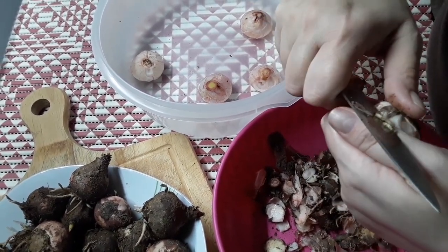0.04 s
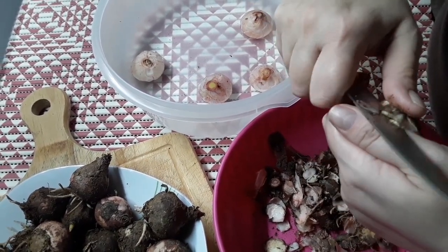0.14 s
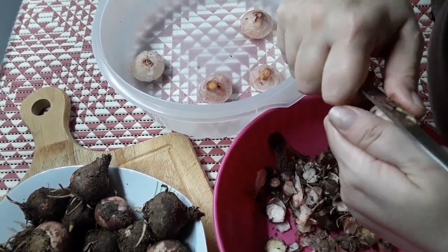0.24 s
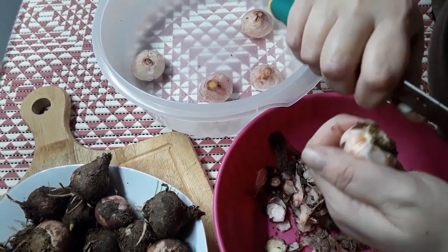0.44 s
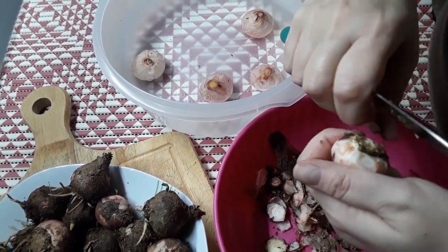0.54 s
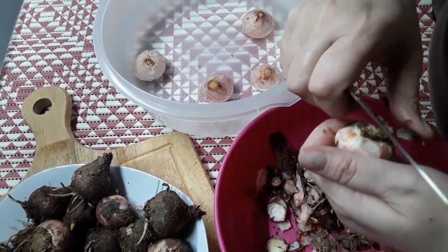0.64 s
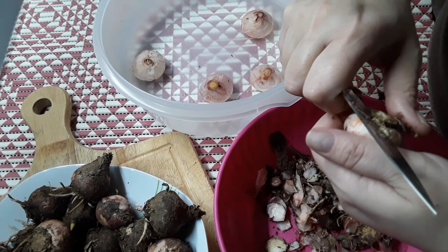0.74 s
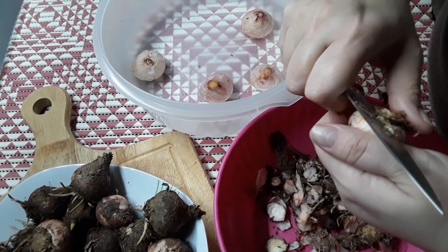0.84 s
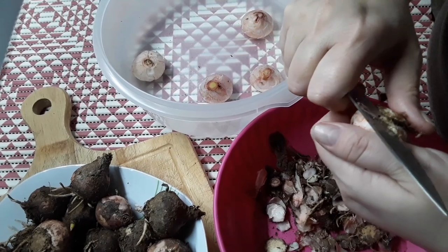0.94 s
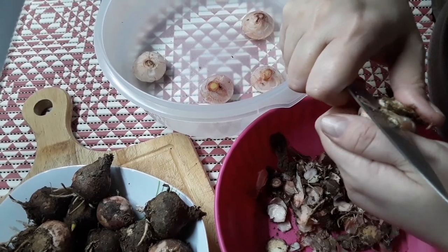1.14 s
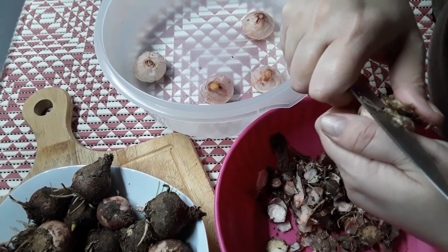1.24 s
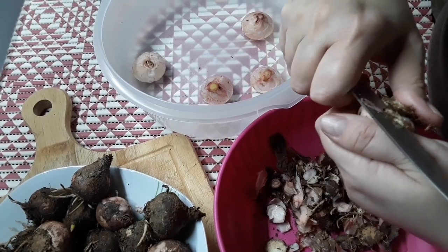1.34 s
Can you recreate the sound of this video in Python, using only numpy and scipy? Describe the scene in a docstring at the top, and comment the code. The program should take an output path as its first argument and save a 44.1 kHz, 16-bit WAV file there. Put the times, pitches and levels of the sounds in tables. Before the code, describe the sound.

Close up in a kitchen, a knife scrapes dry skin off a bulb with a quick cluster of ticks and two crisp snaps. A faint appliance hum and hiss carry on, with one small tick near the end.

```python
"""A small knife peels a bulb, close up, over a plastic bowl in a kitchen.
The blade scrapes the dry skin, slips through with a soft knock, and the skin breaks off in sharp snaps.
Hands, bowl and table throw each sound straight back, ahead of a light room tail.
Behind it all an appliance hums under a faint hiss."""
import sys
import numpy as np
from scipy import signal
from scipy.io import wavfile
from scipy.ndimage import uniform_filter1d

SR = 44100
rng = np.random.default_rng(int(sys.argv[2]) if len(sys.argv) > 2 else 0)


def generate_wav(sig):
    """Save sig (samples, or channels by samples) to the path in sys.argv[1] as 16-bit PCM at SR."""
    pcm = np.round(np.clip(np.atleast_2d(sig).T, -1, 1) * 32767).astype(np.int16)
    wavfile.write(sys.argv[1], SR, pcm)


N = 61739

# snaps of dry skin: start_s, level_db, ring_hz, ring_t60_s, crackle_db (against the ring)
SKIN_SNAPS = [(0.196, -30, 8900, .003, -1), (0.229, -17.5, 7570, 0.011, -17),
              (0.2462, -26.5, 8300, .004, -4.5), (0.2640, -20.5, 7600, 0.0017, -6.5),
              (0.2991, -32, 11200, 0.0043, -6), (0.3192, -41, 8100, 0.0027, -2),
              (0.3314, -2.5, 8110, 0.0044, -15), (0.3328, -14.5, 11700, .0042, -17),
              (0.3760, -8, 7910, 0.0038, -13.5), (1.1569, -31, 7550, 0.0083, -4)]
# tone of tearing fibres: frequency_hz, relative_db
CRACKLE_EQ = [(100, -9), (700, -18), (1100, -4.5), (2000, -22), (3200, -7.5), (4400, -9.5), (5900, -22),
              (7000, 7.5), (9400, 6), (10600, -2.5), (11700, -1), (12900, -13), (13900, -6), (15700, -10)]
# blade strokes: start_s, length_s, level_db, attack_s, release_s, rustle_db (against the stroke)
BLADE_STROKES = [(.125, .016, -40.7, .010, .003, -11), (.1965, .030, -33, .002, .005, -24),
                 (.238, .014, -49, .004, .012, -18), (.372, .004, -42, .003, .003, -12),
                 (.508, .012, -57, .004, .01, -11)]
# tone of scraped skin: frequency_hz, relative_db
SCRAPE_EQ = [(150, -42), (1000, -19), (2000, -30), (3200, -18.5), (4500, -28), (6200, -23), (7500, -1),
             (8500, 0), (9800, -10.5), (11500, -19), (13000, -25.5), (15700, -21)]
# tone of loose papery skin: frequency_hz, relative_db
RUSTLE_EQ = [(200, -20), (1500, -21), (3200, 8.5), (5500, -3.5), (8000, -8), (15000, -8)]
# resonances of bulb and blade: pitch_hz, relative_db, t60_s
BULB_MODES = [(645, -6.5, 0.021), (907, -1.5, 0.025), (1085, 7.5, 0.015), (1220, -11, 0.022),
              (2440, -5, 0.03), (3500, -28, 0.0066)]
# slaps off hands, bowl and table: delay_s, gain
CLOSE_ECHOES = [(.00148, 0.25), (.0031, 0.32), (.0042, 0.16), (.0062, 0.077)]
# tone of the room tail: frequency_hz, relative_db
ROOM_EQ = [(200, 9.5), (1200, -1), (2500, 2.5), (4500, 2.5), (6500, 3), (8100, -6.5), (10000, -1),
           (15000, -5.5)]
# motor tones: pitch_hz, level_db, unsteadiness (0-1)
MOTOR_TONES = [(49, -69, .4), (100.2, -66, 0.7), (121.7, -63.5, 1), (198.3, -57.5, 0.09),
               (238.6, -67.5, 0.35), (315.5, -60.5, 0.47), (1101, -71, 1)]
# swells of the strongest hum tone: time_s, relative_db
DRONE_SWELLS = [(0.0, -50), (0.116, -48.5), (0.15, -71), (0.35, -47), (0.528, -58.5), (0.712, -55),
                (0.742, -47), (0.868, -51.5), (0.906, -70), (0.988, -53.5), (1.21, -49.5), (1.284, -64),
                (1.32, -60), (1.4, -75)]
# tone of the hiss: frequency_hz, relative_db
HISS_EQ = [(20, -25), (70, -18), (120, 1), (190, -3), (270, -17.5), (380, -8), (480, -17), (650, -12),
           (950, -21), (1500, -14), (2000, -19.5), (2900, -19), (3700, -35), (4700, -29), (6000, -38),
           (7600, -16.5), (8600, -20.5), (9600, -16.5), (10800, -20.5), (11900, -32), (12900, -38),
           (15500, -38)]
# whistling bands in the hiss: centre_hz, width_hz, boost_db
HISS_WHISTLES = [(2281, 109, 14.4), (2473, 77, 13.55), (2724, 70, 8.8), (5187, 268, 13.1)]


def snap(level_db, ring_hz, ring_t60_s, crackle_db):
    """The skin breaks with a short high ring; torn fibres crackle just after."""
    ring_rise_s, crackle_rise_s = 0.00013, 0.0011
    t = np.arange(SR // 20) / SR
    ring = np.sin(2 * np.pi * ring_hz * t) * (1 - np.exp(-t / ring_rise_s)) * decay(t, ring_t60_s)
    tearing = np.minimum(t / crackle_rise_s, 1) * decay(t, t60_s=0.017)
    fibres = colour(rng.standard_normal(len(t)) * tearing, CRACKLE_EQ)
    return amp(level_db) * (ring + amp(crackle_db) * fibres)


def scrape(length_s, level_db, attack_s, release_s, rustle_db):
    """The edge sticks and slips on the skin: dense tiny clicks over a smooth rub, and a duller rustle."""
    slips_per_s, spread_db, rub_gain = 2600, 8, 0.48
    t = np.arange(SR // 5) / SR
    release = np.exp(-np.maximum(t - length_s, 0) / release_s)
    force = amp(level_db) * np.minimum(t / attack_s, 1) * release
    slip_db = spread_db * np.minimum(rng.exponential(1, len(t)), 2)
    clicks = amp(slip_db) * rng.choice([-1, 1], len(t))
    slips = unit(clicks * (rng.random(len(t)) < slips_per_s / SR))
    rub, rustle = rng.standard_normal((2, len(t)))
    grit = colour(force * unit(slips + rub_gain * rub), SCRAPE_EQ)
    return grit + amp(rustle_db) * colour(force * rustle, RUSTLE_EQ)


def knock(level_db, rise_s):
    """The blade slips through and knocks the bulb; both ring in a few damped modes."""
    t = np.arange(SR // 10) / SR
    modes = sum(amp(db) * np.sin(2 * np.pi * hz * t) * decay(t, t60_s) for hz, db, t60_s in BULB_MODES)
    return amp(level_db) * modes * (1 - np.exp(-t / rise_s))


def kitchen(dry, bowl_db=-13, room_db=-13):
    """Scatter inside the bowl and close slaps, which all feed the room's tail."""
    near = dry + amp(bowl_db) * tail(dry, t60_s=0.072, delay_s=CLOSE_ECHOES[0][0])
    for delay_s, gain in CLOSE_ECHOES:
        add(near, delay_s, gain * dry)
    return near + amp(room_db) * tail(colour(near, ROOM_EQ), t60_s=0.74, delay_s=0.0049)


def tail(x, t60_s, delay_s):
    """Diffuse reflections of energy 1 that start after a delay and die away."""
    t = np.arange(N) / SR
    taps = rng.standard_normal(N) * decay(t, t60_s) * (t > delay_s)
    return signal.fftconvolve(x, taps / np.linalg.norm(taps))[:N]


def drone(pitch_hz=158, trim_db=-0.5):
    """The strongest tone of the appliance, swelling and sinking."""
    t = np.arange(N) / SR
    level_db = trim_db + np.interp(t, *np.transpose(DRONE_SWELLS))
    return amp(level_db) * unit(np.sin(2 * np.pi * (pitch_hz * t + rng.random())))


def hum(whine_hz=12160, whine_db=-66):
    """Low motor tones, each wavering by its own amount, and a thin high whine."""
    t = np.arange(N) / SR
    whine = waver(unsteadiness=0.76, rate_hz=63) * np.exp(2j * np.pi * whine_hz * t)
    tones = amp(whine_db) * unit(whine.real)
    for hz, db, unsteadiness in MOTOR_TONES:
        tone = waver(unsteadiness, rate_hz=5.4) * np.exp(2j * np.pi * (hz * t + rng.random()))
        tones += amp(db) * unit(tone.real)
    return tones


def waver(unsteadiness, rate_hz):
    """A complex gain that lets a tone wander in level and phase."""
    hz = np.fft.fftfreq(N, 1 / SR)
    spectrum = rng.standard_normal(N) + 1j * rng.standard_normal(N)
    drift = unit(np.fft.ifft(spectrum / (1 + (hz / rate_hz) ** 2)))
    return 1 - unsteadiness + unsteadiness * drift


def hiss(level_db=-49.5, patch_db=1.33):
    """A steady bed of noise with a few whistling bands and faint drifting patches."""
    frames = dict(nperseg=2048, noverlap=1536)
    hz, _, spectra = signal.stft(rng.standard_normal(N), SR, **frames)
    whistles_db = sum(db * np.exp(-((hz - centre) / width) ** 2) for centre, width, db in HISS_WHISTLES)
    shape_db = eq_db(HISS_EQ, hz) + whistles_db
    patches = uniform_filter1d(rng.standard_normal(spectra.shape), size=16, axis=0)  # smear in frequency
    patches = unit(uniform_filter1d(patches, size=6, axis=1))  # then in time
    spectra *= amp(shape_db[:, None] + patch_db * patches)
    return amp(level_db) * unit(signal.istft(spectra, **frames)[1][:N])


def colour(x, eq, size=2048):
    """Minimum-phase filter of energy 1 that follows an EQ curve."""
    hz = abs(np.fft.fftfreq(size, 1 / SR))
    log_gain = np.log(amp(eq_db(eq, hz)))
    response = np.exp(np.conj(signal.hilbert(log_gain)))
    taps = np.fft.ifft(response).real[:size // 2]
    return signal.fftconvolve(x, taps / np.linalg.norm(taps))[:len(x)]


def eq_db(eq, hz):
    """Reads an EQ curve on a log-frequency axis."""
    points_hz, points_db = np.transpose(eq)
    return np.interp(np.log(hz + 1), np.log(points_hz + 1), points_db)


def decay(t, t60_s):
    """A fade that falls 60 dB in t60_s."""
    return amp(-60 * t / t60_s)


def amp(db):
    """Decibels to gain."""
    return 10 ** (np.asarray(db) / 20)


def unit(x):
    """Scales to rms 1."""
    return x / np.sqrt(np.mean(abs(x) ** 2) + 1e-20)


def add(mix, start_s, sound):
    """Mixes a sound in at start_s."""
    part = mix[max(round(start_s * SR), 0):][:len(sound)]
    part += sound[:len(part)]


def scene():
    """Knife work in the centre, slightly wide in its treble, over hum and hiss."""
    blade_side_db, snap_side_db, wide_above_hz = -17.5, -36, 5500
    snaps, blade = np.zeros((2, N))
    for start_s, *settings in SKIN_SNAPS:
        add(snaps, start_s, snap(*settings))
    for start_s, *settings in BLADE_STROKES:
        add(blade, start_s, scrape(*settings))
    add(blade, start_s=0.2272, sound=knock(level_db=-27.5, rise_s=0.00043))
    mid = kitchen(snaps + blade) + hum() + drone() + hiss()
    wide = amp(blade_side_db) * blade + amp(snap_side_db) * snaps
    treble = signal.butter(2, wide_above_hz, "high", fs=SR, output="sos")
    side = signal.sosfiltfilt(treble, signal.hilbert(wide).imag)  # a 90-degree shift widens, stays centred
    return np.array([mid + side, mid - side])


def record(dry):
    """A steep high cut takes off the topmost air."""
    cutoff_hz = 15900
    high_cut = signal.firwin(401, cutoff_hz, window=("kaiser", 8), fs=SR)
    return signal.oaconvolve(dry, high_cut[None], "same")


dry = scene()
out = record(dry)
generate_wav(out)
```